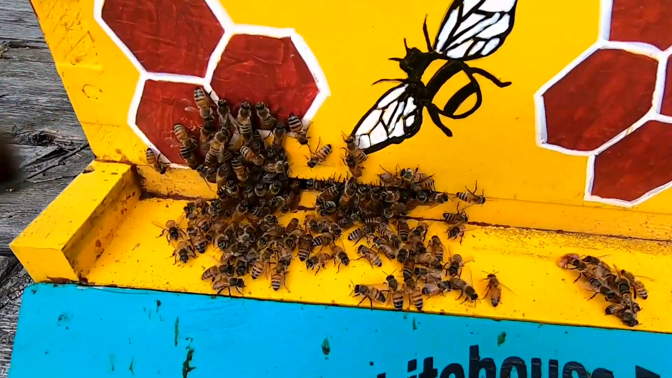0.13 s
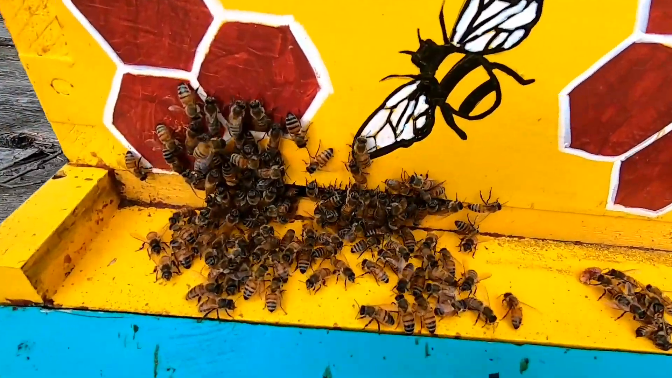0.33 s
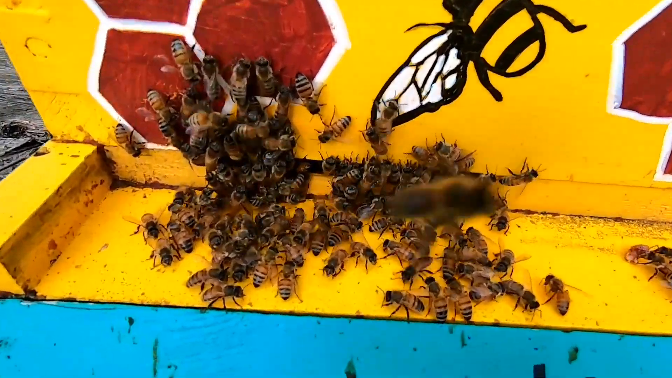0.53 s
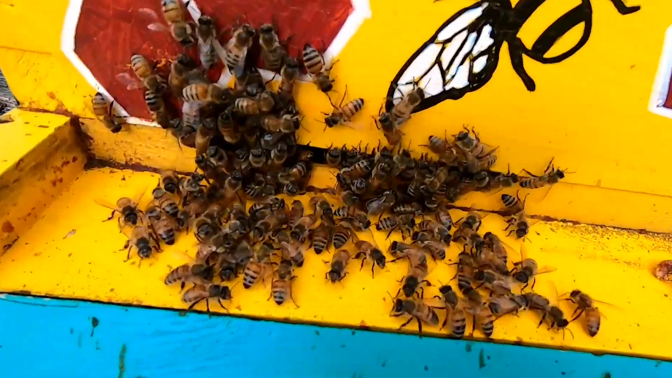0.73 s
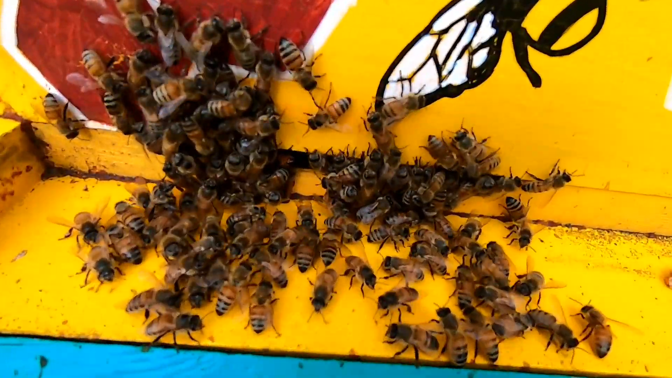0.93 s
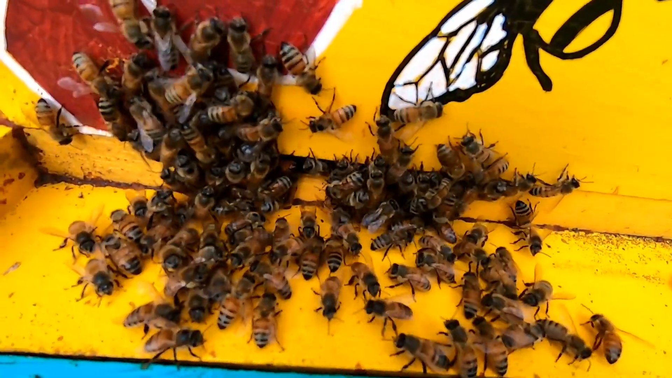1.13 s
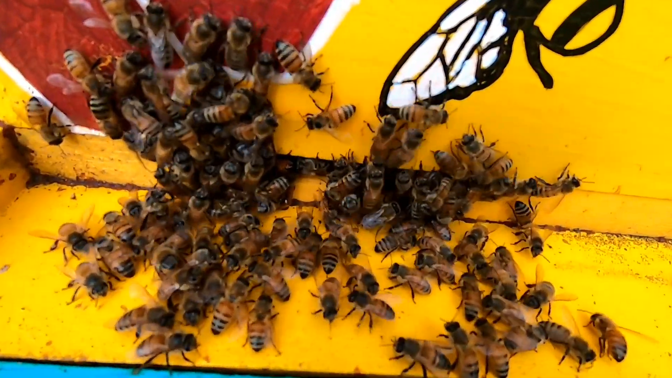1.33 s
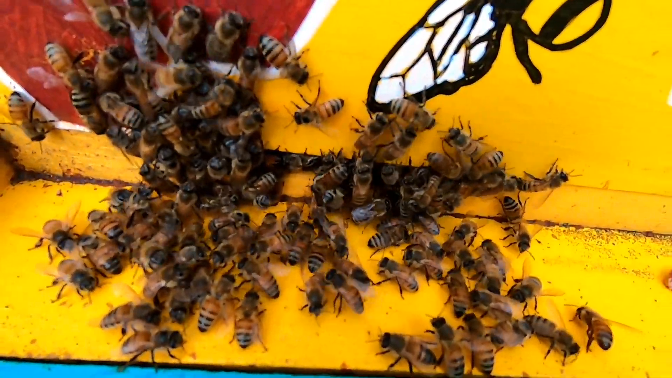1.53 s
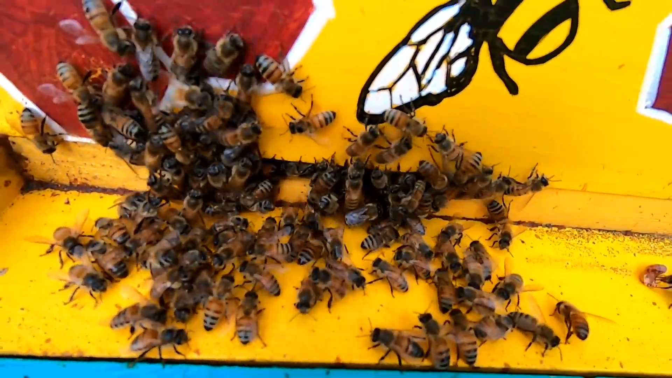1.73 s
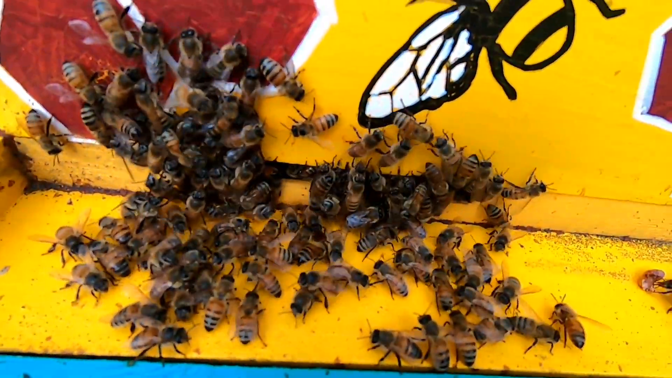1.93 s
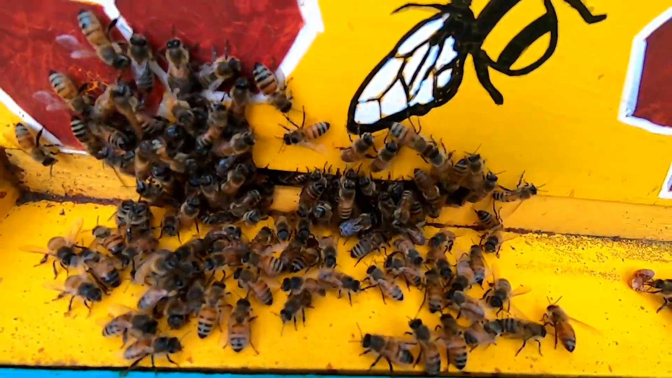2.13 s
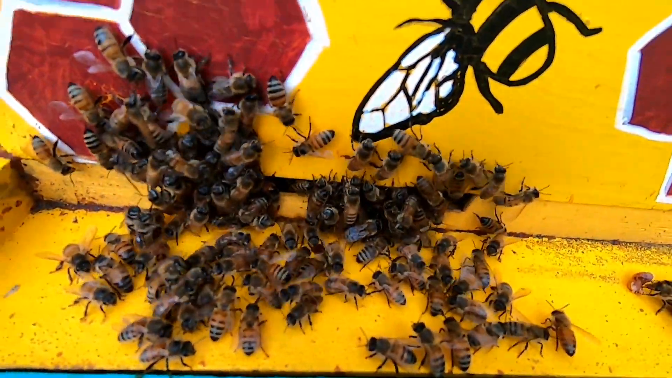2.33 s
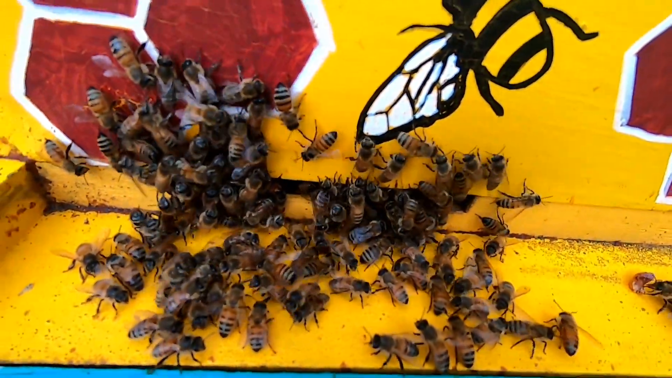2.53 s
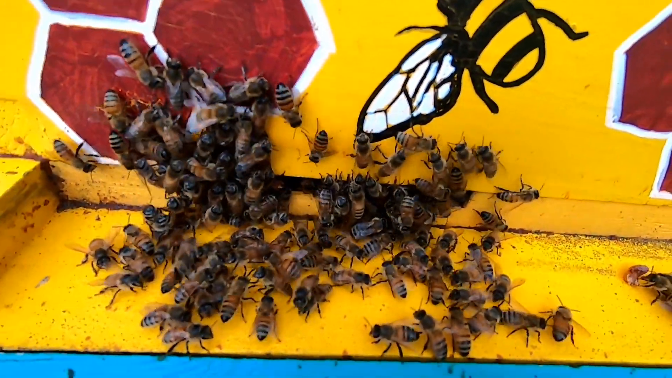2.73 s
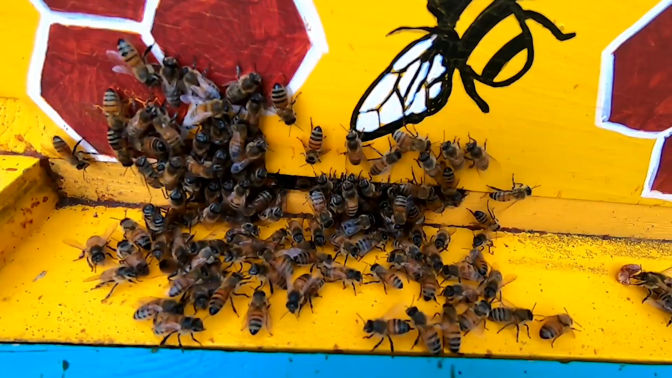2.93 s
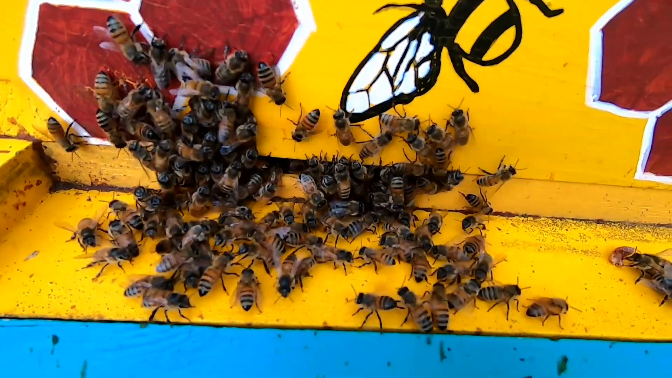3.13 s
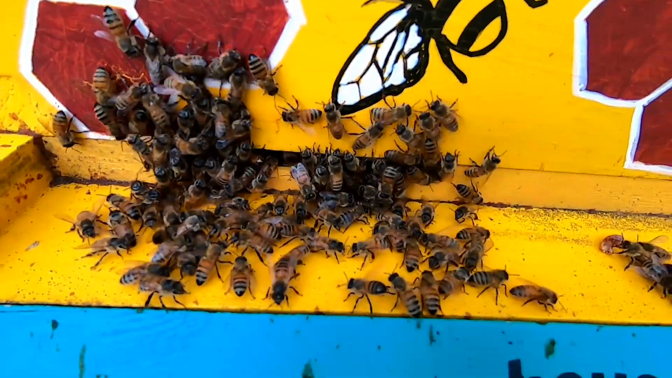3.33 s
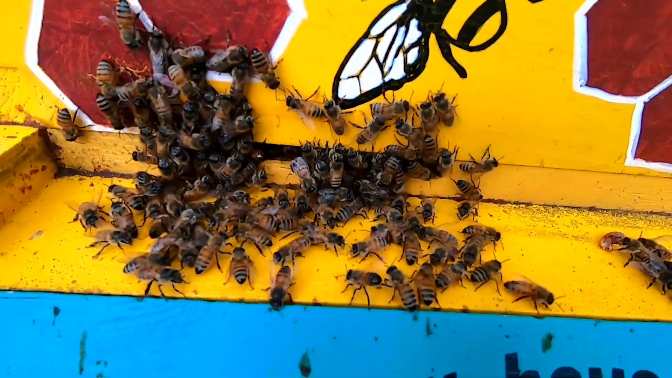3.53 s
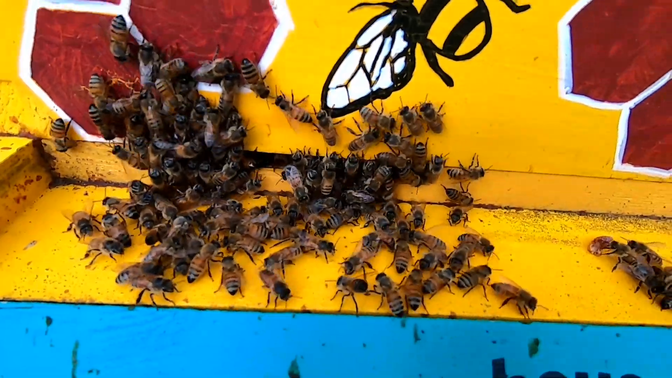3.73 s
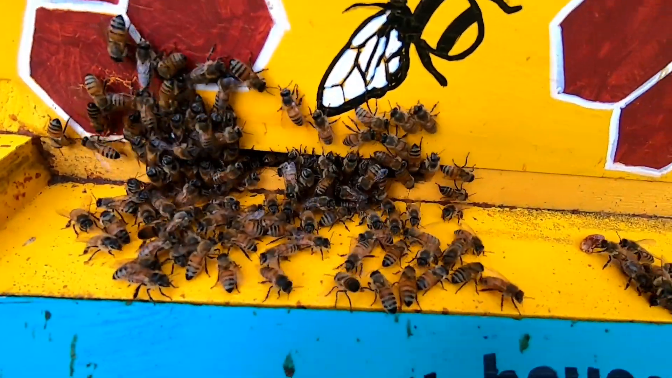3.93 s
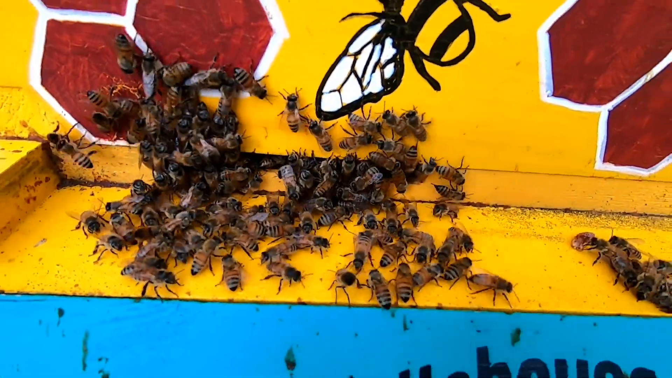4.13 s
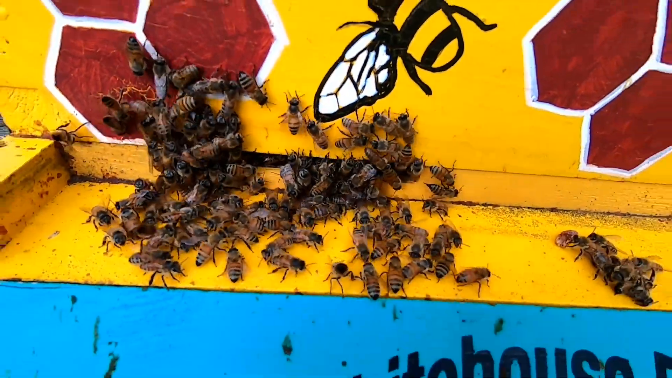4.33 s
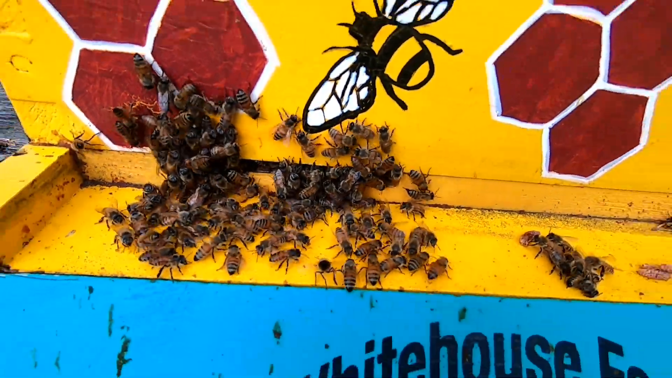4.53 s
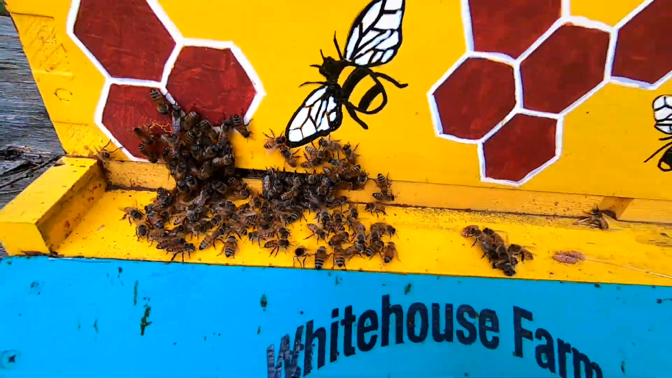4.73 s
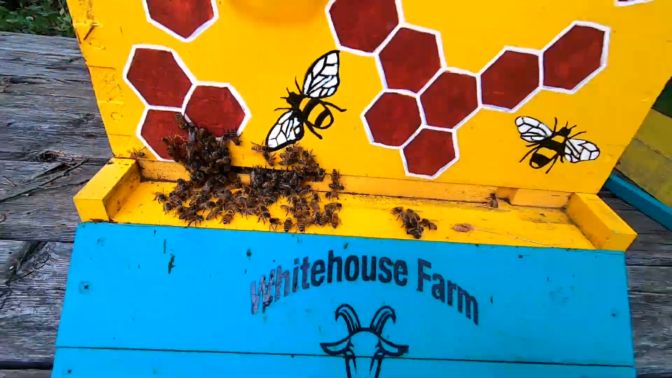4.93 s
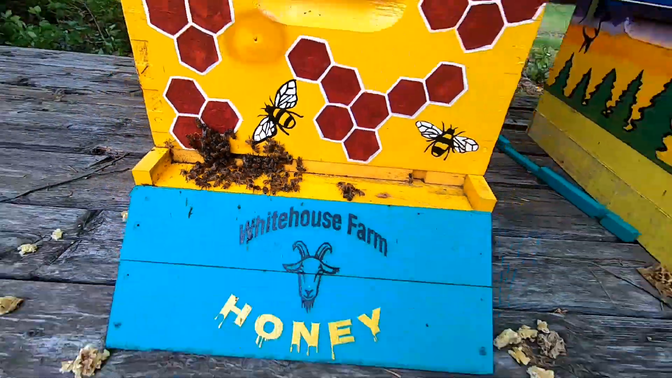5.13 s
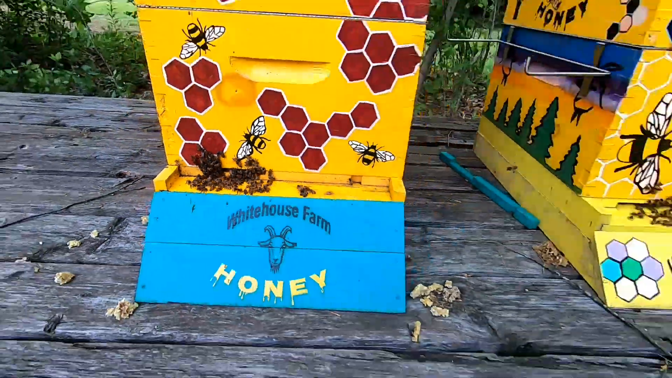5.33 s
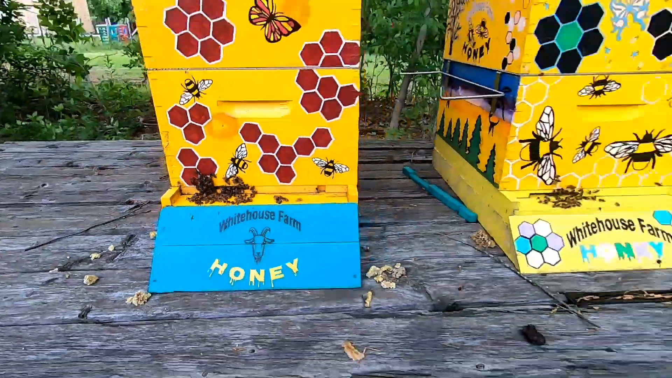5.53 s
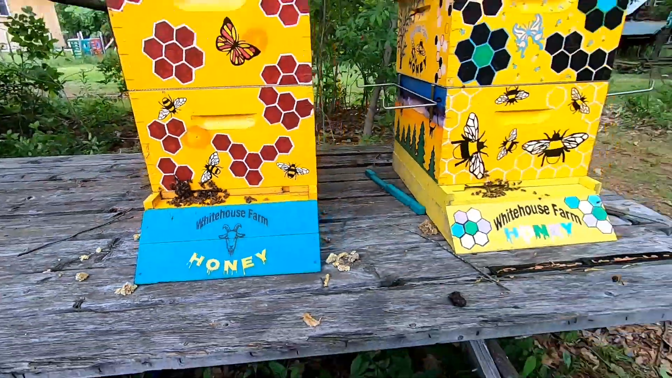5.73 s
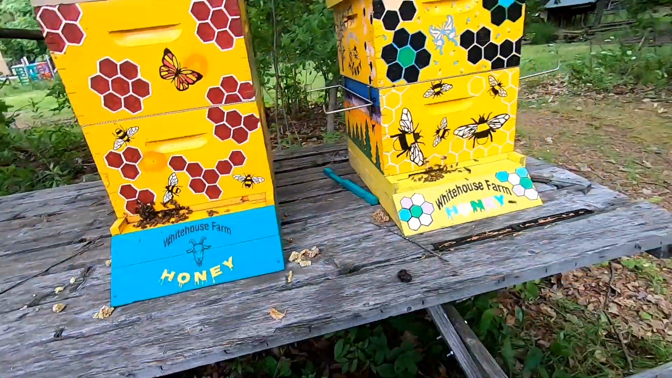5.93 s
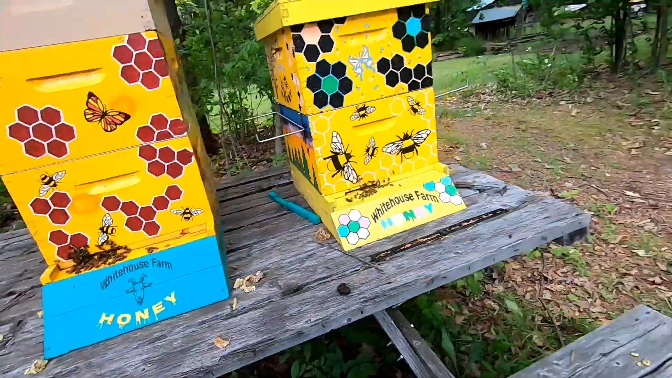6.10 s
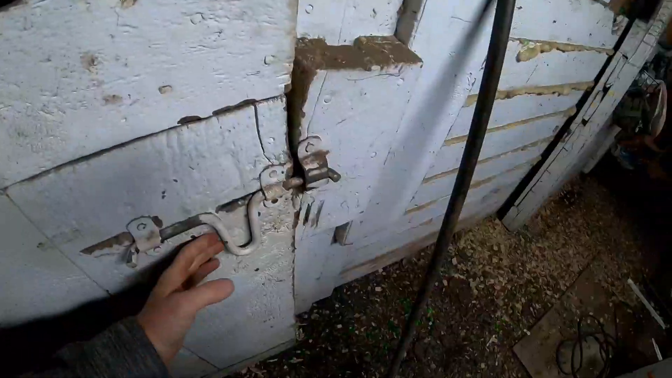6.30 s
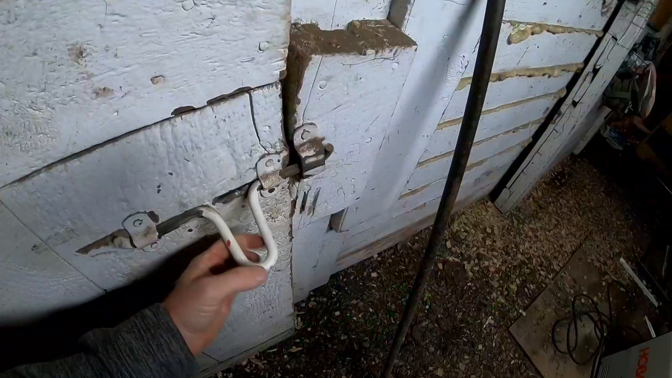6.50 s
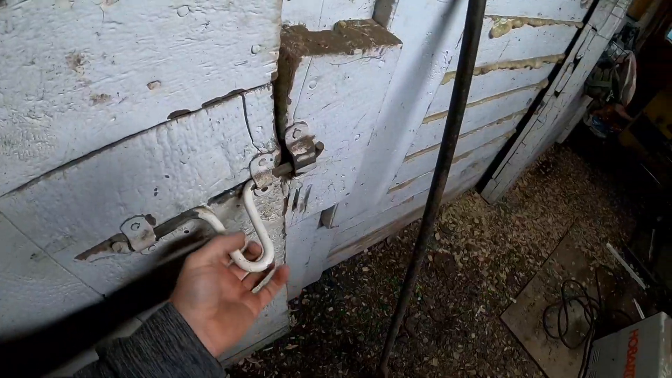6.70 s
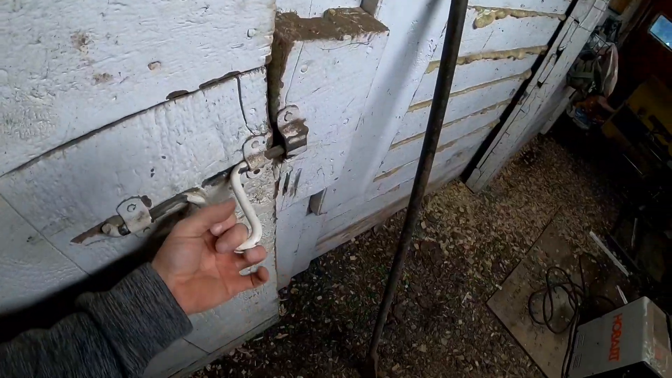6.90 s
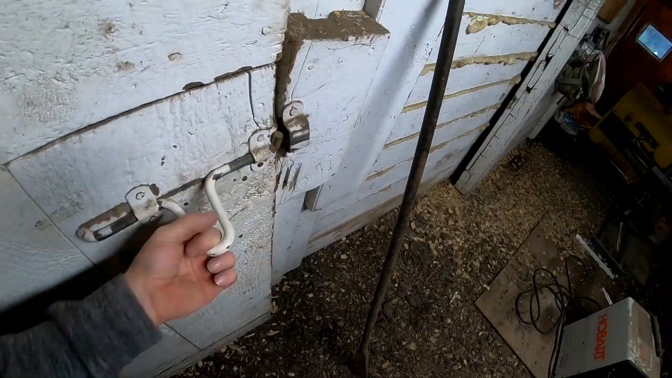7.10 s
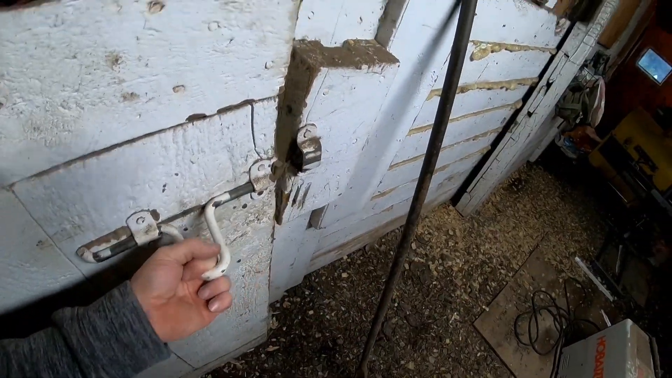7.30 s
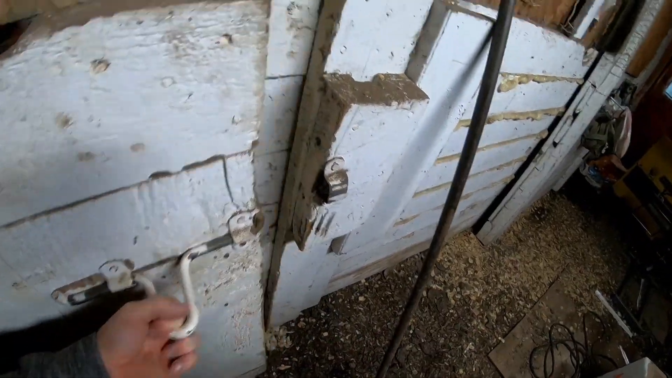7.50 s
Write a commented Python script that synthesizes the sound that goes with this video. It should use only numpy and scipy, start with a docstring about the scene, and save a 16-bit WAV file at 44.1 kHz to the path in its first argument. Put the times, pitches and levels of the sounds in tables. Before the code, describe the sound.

Outdoors at a hive, a faint wandering hum of bees sits under soft air and fluttering wind buffets. A bee zips past early on, then a louder, longer one amid rumbling gusts, while hiss swells on the left. Sound stops briefly. In a quiet shed, a steel bolt rattles and clanks back in three throws, wood knocks and booms, and a door creaks and scrapes open.

```python
"""Honeybees hum at a hive entrance: wandering harmonic tones, with single bees flying close past the microphone.
A breeze, made of coloured noise, buffets it. For a while the sound widens and a hiss swells on the left.
After a short silence, in a shed, a steel slide bolt is worked back in three clanks of ringing modes,
and the wooden door starts to scrape open in noisy jolts, with a boom and a short harmonic creak."""
import sys
import numpy as np
from scipy import signal
from scipy.fft import rfft, irfft, next_fast_len
from scipy.io import wavfile
from scipy.ndimage import uniform_filter1d

SR = 44100
rng = np.random.default_rng(int(sys.argv[2]) if len(sys.argv) > 2 else 0)


def pcm_store(signal):
    """Save signal as 16-bit PCM."""
    levels = np.round(np.clip(np.atleast_2d(signal), -1, 1) * 32767)
    wavfile.write(sys.argv[1], SR, levels.astype(np.int16).T)


N = 337805
T = np.arange(N) / SR

# deep colour of the breeze, relative: [f/Hz, level/dB]
RUMBLING_BREEZE = [(15, -7), (40, 2.5), (100, -0.5), (170, -10), (260, -14.5), (400, -28), (800, -36.5),
                   (2000, -54.5)]
# modes of the wooden door panel, levels relative: [f/Hz, level/dB, t60/s]
DOOR_MODES = [(105.6, -1.5, 0.4), (150, 3, 0.13), (198.7, 7, 0.12), (267.6, 0, 0.2), (311.4, -1.5, 0.15),
              (388, -2.5, 0.21)]


def amp(db):
    """Decibels to gain."""
    return np.exp(np.asarray(db) * (np.log(10) / 20))


def unit(x):
    """Scale to rms 1."""
    return x / np.sqrt(np.mean(x ** 2) + 1e-20)


def since(s):
    """Seconds gone by since time s, zero before it."""
    return np.maximum(T - s, 0)


def curves(rows, t=T):
    """Each column of a table, joined by straight lines in time."""
    s, *columns = np.transpose(rows)
    return [np.interp(t, s, c) for c in columns]


def at_pitch(points, hz):
    """Read a spectrum on a log-frequency axis."""
    f, value = np.transpose(points)
    return np.interp(np.log(hz), np.log(f), value)


def colour(x, points):
    """Causal minimum-phase filter with the given spectrum, falling off beyond its ends; rms 1."""
    size = next_fast_len(len(x) + SR // 10)
    hz = np.maximum(np.abs(np.fft.fftfreq(size, 1 / SR))[:size // 2 + 1], 1)
    ends = np.minimum(hz / points[0][0], 1) ** 2 * np.minimum(points[-1][0] / hz, 1) ** 2
    cepstrum = irfft(np.log(amp(at_pitch(points, hz)) * ends), size)
    # folding the cepstrum forward makes the filter causal
    response = np.exp(rfft(2 * cepstrum[:size // 2], size) - cepstrum[0])
    return unit(irfft(rfft(x, size) * response, size)[:len(x)])


def noise(points, size=N):
    """Coloured noise, rms 1."""
    return colour(rng.standard_normal(size), points)


def walk(rate, size=N):
    """Smooth random wander with rms 1, from `rate` random steps a second."""
    k = max(int(SR / rate), 2)
    steps = np.repeat(rng.standard_normal(size // k + 1), k)[:size]
    return unit(uniform_filter1d(uniform_filter1d(steps, k), k))


def add(out, s, x):
    """Mix x in from time s."""
    i = max(int(s * SR), 0)
    out[i:i + len(x)] += x[:max(N - i, 0)]


def ringing(modes, t):
    """Damped modes that build up over a cycle or two, never quite at the same pitch twice."""
    scatter_db = 3  # each blow lands on a different spot and favours other modes
    out = 0
    for hz, db, t60 in modes:
        phase = 2 * np.pi * (hz * (1 + 0.0061 * rng.standard_normal()) * t + rng.random())
        decay = amp(db + scatter_db * rng.standard_normal() - 60 * t / t60)
        build_up = (1 - np.exp(-2 * hz * t)) ** 2
        out = out + decay * np.sin(phase) * build_up
    return out


def stereo_width():
    """Share by which the image is open, 0-1."""
    # opening and closing of the image: [t/s, share 0-1]
    openness = [(2.78, 0.12), (3.05, 0.7), (3.4, 0.85), (4.75, 1), (5.15, 0.53), (5.5, 0.076)]
    return np.clip(np.interp(T, *np.transpose(openness), left=0, right=0), 0, 1)


def colony(count=3):
    """More bees hover round the hive, each a harmonic tone drifting in pitch and distance."""
    out = 0
    for _ in range(count):
        hz = 238 * (1 + 0.055 * walk(3) + 0.00985 * walk(60))
        phase = 2 * np.pi * np.cumsum(hz) / SR
        tone = sum(np.sin(k * phase) / k ** 0.94 for k in range(1, 8))
        out = out + amp(7.9 * walk(2.69)) * tone
    fade_db = np.interp(T, [4.7, 5.3], [0, -6.5])  # the hum drops to a lower level near the end
    return amp(-61.5 + fade_db) * unit(out)


def wings(hz, bright_db, count=24):
    """Fundamental, overtones with a small rush of air, and the sharp slap of each wing stroke."""
    # overtones of a wingbeat, relative: [f/Hz, level/dB]
    buzz = [(450, 9), (700, -1.5), (920, -7), (1170, 0), (1450, -14.5), (1720, -10), (2500, -20),
            (4000, -45), (8000, -56)]
    # one slap, relative: [f/Hz, level/dB]
    slap = [(300, -10.5), (650, 3.5), (1200, -10), (2000, -20), (3500, -28), (8000, -40), (15000, -47)]
    size = len(hz)
    phase = 2 * np.pi * np.cumsum(hz * (1 + 0.0245 * walk(130.2, size))) / SR
    turning = walk(26, size)  # the bee turns, so its buzz brightens and dulls
    overtones = 0
    for k in range(2, count):
        tilt_db = (bright_db + 0.54 * turning) * np.log(k / 2)
        db = at_pitch(buzz, k * hz) + tilt_db + 2.7 * walk(70, size)
        overtones = overtones + amp(db) * np.sin(k * phase + .5 * rng.standard_normal())
    rush = noise(buzz, size) * (1 + np.cos(phase))
    strokes = 1 + 0.13 * walk(237.4, size)  # wing strokes differ in strength
    beats = np.diff(phase // (2 * np.pi), prepend=0)  # one click a wingbeat
    slaps = colour(beats * amp(3.9 * rng.standard_normal(size)), slap)
    return unit(np.sin(phase)), unit(strokes * (unit(overtones) + amp(-9.5) * rush)), slaps


def far_bees():
    """Bees further off swell and fade, gliding a little in pitch."""
    # passes at some distance:
    # [start t/s, length/s, first wingbeat f/Hz, last wingbeat f/Hz, fundamental peak level/dB,
    #  overtones re fundamental level/dB]
    flights = [(0, 0.29, 275.6, 247.6, -58.5, 0.5), (0.551, 0.2, 236.8, 226, -56.5, 2),
               (0.737, 0.094, 248.2, 224, -60.5, 4.5), (1.121, 0.29, 246.2, 262.6, -53, -3.5),
               (1.241, 0.086, 262, 253, -42, -10), (1.681, 0.22, 255.6, 224.6, -56, -4.5),
               (3.144, 0.087, 221.6, 217, -42.5, -5), (3.187, 0.17, 233.2, 218.5, -50, -5),
               (3.965, 0.19, 233.3, 245.5, -51.5, -1.5)]
    out = np.zeros(N)
    for s, length, first_hz, last_hz, db, buzz_db in flights:
        size = int(length * SR)
        low, high, _ = wings(np.linspace(first_hz, last_hz, size), buzz_db, count=12)
        swell = np.sin(np.linspace(0, np.pi, size))
        add(out, s, amp(db) * swell * (low + amp(buzz_db) * high))
    return out


def breeze():
    """Eddies flutter and rumble on the microphone, harder in each gust; wing wash and bumps give damped swings."""
    # the breeze between gusts, before trims: [t/s, level/dB]
    lull = [(0, -44.5), (.55, -51.5), (1.0, -51), (1.7, -55.5), (2.1, -52.5), (2.95, -52.5), (3.3, -52.5),
            (3.9, -50.5), (4.5, -41), (5.0, -50.5), (5.5, -55), (5.9, -55), (6.05, -58)]
    # light flutter, which gives way to the deeper rumble as the image widens, relative: [f/Hz, level/dB]
    flutter = [(22, -13), (48, 8), (90, -0.5), (180, 1.5), (280, -8), (400, -20), (800, -42.5), (2000, -68)]
    # gusts that buffet the microphone, before trims: [t/s, length/s, peak level/dB]
    gusts = [(.09, 0.12, -47), (0.255, 0.073, -41), (0.72, 0.037, -40), (0.79, 0.095, -41.5),
             (0.914, 0.1, -46.5), (1.967, 0.19, -44.5), (2.17, 0.069, -45), (2.256, 0.074, -50),
             (2.42, 0.038, -44.5), (2.557, 0.054, -42.5), (3.196, 0.08, -43.5), (3.551, 0.049, -34.5),
             (3.739, 0.077, -39), (3.908, 0.02, -39), (4.154, 0.038, -34.5), (4.303, 0.057, -34.5),
             (4.39, 0.062, -32), (4.608, 0.049, -29.5), (4.82, 0.13, -40.5), (5.037, 0.11, -45),
             (5.35, 0.043, -47), (5.723, 0.12, -51), (5.826, 0.04, -43.5), (5.919, 0.05, -38)]
    # wing wash and light bumps on the microphone:
    # [t/s, swing peak level/dB, ring f/Hz, length/s, crack re ring level/dB]
    puffs = [(1.4599, -23.5, 474, 0.0031, -9), (1.461, -20.5, 75.4, 0.0069, -18),
             (1.4683, -22.5, 150, 0.0056, -12), (2.003, -36, 110, 0.0063, -13),
             (2.14, -40.5, 140, .004, -16), (2.175, -40, 196, 0.016, -14), (2.276, -38, 100, 0.0043, -13),
             (2.41, -36.5, 95, .005, -22), (2.54, -35, 172, .009, -20), (2.566, -40, 190, 0.01, -12),
             (4.138, -25, 530, 0.003, -3), (4.142, -25.5, 149, 0.0043, -31), (4.288, -39, 3450, 0.0032, 0),
             (4.392, -26, 133, 0.026, -36), (4.617, -20.5, 109, 0.0038, -25),
             (4.817, -26, 109, 0.0052, -36), (5.619, -45, 300, 0.0022, -2), (5.625, -38.5, 54.4, .016, -36),
             (5.697, -36.5, 150, 0.007, -22), (5.974, -35, 172, 0.0055, -25)]
    # the crack of a bump, relative: [f/Hz, level/dB]
    crack = [(150, -16.5), (350, 10), (800, -4.5), (1300, -21.5), (2500, -27), (6000, -37), (15000, -57)]
    deep = stereo_width()
    eddies = np.sqrt(1 - deep) * noise(flutter) + np.sqrt(deep) * amp(2.5) * noise(RUMBLING_BREEZE)
    power = amp(curves(lull)[0] + 1.0 + 1.5 * walk(13)) ** 2
    for s, length, db in gusts:
        near = np.abs(T - s) < 2 * length
        power[near] += (amp(db) * np.exp(-2 * ((T[near] - s) / length) ** 2)) ** 2
    out = eddies * np.sqrt(power) * amp(-.5 + 2.0 * walk(30))
    t = T[:SR // 5]
    for s, db, hz, length, crack_db in puffs:
        swing = np.sin(2 * np.pi * hz * t) + amp(crack_db) * noise(crack, len(t))
        envelope = (2 * t / length) * np.exp(1 - 2 * t / length)  # peaks at half the length
        add(out, s, amp(db) * swing * envelope)
    return out


def outdoor_air():
    """Steady air around the hive: coloured noise with a slight drift in level."""
    # relative: [f/Hz, level/dB]
    air_colour = [(210, -4.5), (350, -3), (510, -4.5), (677, -8.5), (744, -10), (928, -13.5), (3160, -12.5),
                  (4760, -18), (7160, -21), (9660, -26.5), (11100, -34), (12400, -36), (15000, -50)]
    return amp(-57 + 0.23 * walk(2.8)) * noise(air_colour)


def sizzle():
    """A thin, steady band of high noise."""
    return amp(-74) * noise([(11300, -19.0), (12200, -5.5), (15500, -22.5)])


def near_bees():
    """Bees fly right past the microphone: the fundamental swells; at the closest the single wing strokes slap."""
    # close passes, one curve each: [t/s, wingbeat f/Hz, fundamental level/dB, overtones level/dB]
    flights = [
        [(1.365, 261, -62, -60), (1.404, 234.4, -40.5, -46), (1.438, 213.6, -30.5, -43.5),
         (1.454, 228, -42.5, -46), (1.467, 240, -31.5, -39), (1.48, 247.4, -47, -37), (1.497, 242, -45, -46.5),
         (1.52, 240, -61, -58)],
        [(4.5, 233.2, -59.5, -55.5), (4.55, 233.1, -46.5, -45), (4.598, 226.6, -41, -43.5),
         (4.62, 219.3, -34.5, -33.5), (4.656, 216.7, -27.5, -35), (4.684, 223.6, -22.5, -31.5),
         (4.702, 214, -30.5, -32.5), (4.72, 231.6, -23, -30.5), (4.74, 229.2, -41, -36),
         (4.756, 230.5, -38, -32), (4.775, 241.2, -43, -33), (4.8, 240.4, -41, -35.5),
         (4.826, 230.6, -34, -40.5), (4.854, 227.3, -38.5, -46), (4.892, 237.2, -45, -49),
         (4.93, 237.6, -58, -58)],
    ]
    # closest approaches, where each wing stroke slaps: [t/s, length/s, level/dB]
    closest = [(1.464, 0.009, -42.5), (4.715, 0.0088, -30), (4.75, .008, -43)]
    full_buzz_db, dulling = -31, .2  # the buzz is neutral at this level and dulls as it fades
    out = np.zeros(N)
    for flight in flights:
        t = T[(T >= flight[0][0]) & (T < flight[-1][0])]
        hz, body_db, buzz_db = curves(flight, t)
        low, high, slaps = wings(hz, dulling * (buzz_db - full_buzz_db))
        close = sum(amp(db) * np.exp(-((t - s) / length) ** 2) for s, length, db in closest)
        bee = amp(body_db) * low + amp(buzz_db) * high + close * slaps
        add(out, t[0], signal.windows.tukey(len(t), .1) * bee)
    return out


def hiss():
    """A smooth hiss of coloured noise that swells, holds and fades again."""
    # relative: [f/Hz, level/dB]
    hiss_colour = [(180, -15.5), (300, -0.5), (490, -2), (637, -5), (714, -7.5), (1080, -8.5), (3220, -4.5),
                   (3980, -9), (4690, -7.5), (5350, -10.5), (7850, -5), (8600, -10.5), (10100, -23.5),
                   (12700, -29), (14000, -38.5), (15000, -47)]
    swell = 1 - np.exp(-since(2.69) / 0.7)
    fade = np.exp(-since(4.69) / 0.22)
    return amp(-43.5) * noise(hiss_colour) * swell * fade


def widen(mid):
    """The image opens: the left grows louder and leads; the right keeps a faint rumble and hiss of its own."""
    # left over right when fully open: [f/Hz, level/dB]
    balance = [(100, 25), (220, 19), (330, 12), (700, 4.5), (1100, 1), (3000, 1), (3900, 3.5), (4500, 15.5),
               (6000, 26.5)]
    # phase by which the left leads when fully open: [f/Hz, phase/radians]
    lead = [(50, .5), (130, 1.4), (340, 3.9), (700, 3.56), (1500, 4.07), (3000, 4.92), (6000, 8.9)]
    width = stereo_width()
    size = next_fast_len(N)
    hz = np.maximum(np.fft.rfftfreq(size, 1 / SR), 1)
    ratio = amp(at_pitch(balance, hz)) * np.exp(1j * at_pitch(lead, hz))
    side = irfft(rfft(mid, size) * (ratio - 1) / (ratio + 1), size)[:N] * width
    rumble = amp(-52.0 + 4.1 * walk(7.0)) * noise(RUMBLING_BREEZE)
    faint_hiss = amp(-59.0) * noise([(500, -16.0), (3000, -5.5), (5200, -9.5), (9000, -15), (14000, -38.5)])
    return np.array([mid + side, mid - side + width * (rumble + faint_hiss)])


def shed_air():
    """The still shed: steady coloured noise."""
    # relative: [f/Hz, level/dB]
    shed_colour = [(15, -18), (25, -6), (52, -3), (112, -24), (161, -7), (262, -19.5), (340, -24),
                   (737, -25.5), (1440, -34.5), (2020, -28.5), (4380, -29.5), (12000, -61.5), (15600, -101),
                   (22000, -120)]
    return amp(-52) * noise(shed_colour)


def strike(modes, dull, length, dull_t60, ring_db, room_db, room_t60):
    """One blow on a body: first contact and uneven rebounds, its modes, a dense short ring and the shed's echo."""
    rebounds_per_s, touch_s = 420, 0.00093  # small rebounds within a blow, and how long each touches
    t = T[:SR // 2]
    rebounds = (rng.random(len(t)) < rebounds_per_s / SR) * amp(2.1 * rng.standard_normal(len(t)))
    touch = signal.lfilter([1], [1, -np.exp(-1 / (SR * touch_s))], rebounds + 1.05 * (t == 0))
    contact = rng.standard_normal(len(t)) * (0.78 + 2.47 * touch) * np.exp(-t / length)
    ring = ringing(modes, t) * (1 - np.exp(-3 * t / length)) ** 2
    tail = rng.standard_normal(len(t)) * (amp(-60 * t / dull_t60) + amp(room_db - 60 * t / room_t60))
    dense = colour(contact + 0.44 * tail * amp(2.2 * walk(260, len(t))), dull)
    # balance the parts over 20 ms, then level the blow over its first 10 ms
    blow = dense / np.std(dense[:SR // 50]) + amp(ring_db) * ring / np.std(ring[:SR // 50])
    return blow / np.std(blow[:SR // 100])


def latch():
    """The bolt rubs and clacks in its keepers; the planks knock with it and the heavy door answers a little later."""
    # blows of bolt and door:
    # [t/s, door thud level/dB, plank knock level/dB, steel clack level/dB, rattle length/s,
    #  steel ring re clack level/dB]
    clanks = [(6.429, -49.5, -58.5, -56.5, 0.0013, -16), (6.582, -46, -47, -53, 0.0092, -12),
              (6.642, -22, -26, -19.5, 0.0021, -0.5), (6.741, -45, -32.5, -49, 0.0017, -3),
              (6.777, -39, -34.5, -62, 0.0013, -12), (6.787, -42, -40, -64, .002, -12),
              (6.803, -38, -48, -42.5, 0.0032, 0), (6.877, -41, -42.5, -59, 0.0098, -7),
              (6.9358, -30, -28.5, -30.5, 0.0033, -8), (6.9402, -29.5, -24.5, -35.5, 0.0048, -10),
              (6.991, -40, -50, -46.5, 0.0038, -9), (7.052, -51, -58, -57, .002, -6),
              (7.072, -54, -49, -49, 0.0055, -10), (7.139, -28.5, -26.5, -23, 0.0048, -10),
              (7.149, -27.5, -24, -31, 0.012, -10), (7.160, -31, -25.5, -27.5, 0.0056, -11),
              (7.1645, -24.5, -26, -24, 0.0041, -11.5), (7.169, -23, -23.5, -36, 0.0029, -4),
              (7.186, -25, -35.5, -43, 0.0032, -7), (7.203, -31.5, -40, -47.5, 0.0022, -12.5),
              (7.224, -38, -34, -41, 0.0038, -12), (7.241, -36, -32.5, -43.5, 0.0031, -12.5),
              (7.2955, -34, -31, -37, 0.0085, -10), (7.349, -43, -37.5, -55, 0.0068, -11),
              (7.407, -28, -47, -54.5, 0.0049, -10), (7.441, -35, -56.5, -51.5, 0.006, -4),
              (7.598, -23.5, -49, -61, 0.0046, -14), (7.624, -23.5, -46, -59, 0.0045, -14)]
    # throws of the bolt, rubbing harder up to the stop and rattling on after it:
    # [stop t/s, rub level/dB, run-up/s, settling/s]
    throws = [(6.641, -29, 0.013, 0.037), (6.938, -36, 0.0024, 0.025), (7.14, -27.5, 0.019, 0.047)]
    # thin, narrow ringing that swells just before the blow: [t/s, length/s, level/dB]
    thin_rings = [(6.512, 0.12, -62.5), (6.619, 0.042, -34)]
    # modes of planks and bolt, relative: [f/Hz, level/dB, t60/s]
    plank_modes = [(473, -18, .1), (613, 1.5, 0.15), (768, -2.5, 0.13), (862, -0.5, 0.17),
                   (950, -8.5, 0.11), (1040, 4, 0.085), (1240, -8.5, 0.13), (1460, -6, 0.15),
                   (1756, 3, 0.052), (2160, -11, 0.056), (2780, -9.5, 0.087)]
    bolt_modes = [(3200, -22, 0.12), (3790, -6, 0.048), (4300, -20, .16), (4850, -13, 0.11),
                  (5170, 1, 0.073), (5400, 7.5, 0.044), (5960, -7.5, 0.11), (6310, -11, 0.15),
                  (6540, -12, .1), (7620, -18, 0.1)]
    # dense, quickly dying part of door, planks and bolt, relative: [f/Hz, level/dB]
    door_dull = [(30, -19), (70, -19), (150, 4.5), (300, -5), (500, -29), (1200, -40)]
    plank_dull = [(200, -12), (450, 2), (1000, -1), (1900, -8), (2800, -12.5), (5000, -40)]
    bolt_dull = [(1200, -1.5), (2500, -7), (4000, 1), (5300, 3.5), (6400, -9), (7200, -18.5), (8500, -22),
                 (10000, -44), (15000, -64)]
    catches = rng.standard_normal(N) * (rng.random(N) < 2500 / SR)  # small random catches, 2500 a second
    steel = unit(signal.fftconvolve(catches, ringing(bolt_modes, T[:SR // 5]))[:N])
    rub = 0
    for s, db, run_up, settling in throws:
        fall = np.maximum(s - T, 0) / run_up + since(s) / settling
        rub = rub + amp(db) * np.exp(-np.minimum(fall, 20))
    bolt_rasp = amp(5.0) * colour(catches, bolt_dull)
    plank_rasp = amp(10.5) * colour(catches, plank_dull)
    out = rub * amp(1.8 * walk(300)) * unit(steel + bolt_rasp + plank_rasp)
    for s, length, db in thin_rings:
        size = int(length * SR)
        add(out, s, amp(db) * unit(np.hanning(size) * steel[int(s * SR):][:size]))
    for s, thud_db, knock_db, clack_db, length, steel_db in clanks:
        thud = strike(DOOR_MODES, door_dull, length, dull_t60=0.029, ring_db=-2.0, room_db=-10.0, room_t60=0.98)
        knock = strike(plank_modes, plank_dull, length, dull_t60=0.13, ring_db=-0.5, room_db=-4.0, room_t60=0.6)
        clack = strike(bolt_modes, bolt_dull, 1.1 * length, dull_t60=0.056, ring_db=steel_db,
                       room_db=-10.5, room_t60=0.41)
        add(out, s + 0.00318, amp(thud_db) * thud)
        add(out, s, amp(knock_db) * knock)
        add(out, s, amp(clack_db) * clack)
    return out


def door():
    """The door sticks and slips under each push: jolts shake its panel, grit scrapes, wood and metal squeak."""
    # pushes on the door: [start t/s, length/s, rumble level/dB, scrape level/dB, swell/(dB per s)]
    pushes = [(6.534, 0.22, -40.5, -42, 2), (6.837, 0.36, -46, -55, 18), (7.133, 0.064, -26.5, -39, 0),
              (7.306, 0.327, -35.5, -44, 36)]
    # the dragging door's rumble, then its scrape, relative: [f/Hz, level/dB]
    rumble_colour = [(25, -5), (55, -1.5), (105, -0.5), (200, 1), (320, -10), (500, -21), (1200, -47.5)]
    scrape_colour = [(180, -19.5), (300, -9.5), (384, -0.5), (455, -9), (669, -9), (757, -9.5), (1260, -13),
                     (2560, -33.5), (3770, -32.5), (6180, -37), (9820, -73.5), (12000, -70), (15600, -101),
                     (22000, -120)]
    # groans and squeaks of door and bolt: [t/s, length/s, f/Hz, level/dB, pitch scatter share]
    squeaks = [(6.56, 0.072, 200, -39, .1), (6.731, 0.021, 2047, -35.5, 0.13),
               (6.732, 0.034, 1560, -42, 0.13), (6.851, .065, 218.6, -40.5, .18),
               (7.551, 0.026, 3800, -44.5, 0.06)]
    attack_s, release_s = 0.089, 0.066
    shaking = scraping = 0
    for s, length, rumble_db, scrape_db, swell in pushes:
        force = np.minimum(since(s) / attack_s, 1) * np.exp(-since(s + length) / release_s)
        force = force * amp(swell * np.minimum(since(s), length))
        shaking = shaking + amp(rumble_db) * force
        scraping = scraping + amp(scrape_db) * force
    slips = rng.standard_normal(N) * (rng.random(N) < 450 / SR)  # uneven jolts, 450 a second
    panel = unit(signal.fftconvolve(slips, ringing(DOOR_MODES, T[:SR // 2]))[:N])
    rumble = unit(colour(slips, rumble_colour) + amp(-4.5) * panel)
    grit = unit(colour(slips, scrape_colour) + amp(8.0) * noise(scrape_colour))
    out = shaking * rumble + scraping * amp(2.0 * walk(45)) * grit
    for s, length, hz, db, scatter in squeaks:
        size = int(length * SR)
        phase = 2 * np.pi * np.cumsum(hz * (1 + scatter * walk(1500, size))) / SR
        add(out, s, amp(db) * unit(np.hanning(size) * np.sin(phase)))
    return out


def boom():
    """Let go by the bolt, the whole door panel swings at its lowest note."""
    start_s, hz, db, t60_s = 7.166, 106.6, -19, 0.48
    t = since(start_s)
    phase = 2 * np.pi * np.cumsum(hz * (1 + 0.0308 * walk(40))) / SR
    return amp(db - 60 * t / t60_s) * (1 - np.exp(-t * hz)) * np.sin(phase)


def creak():
    """The freed door sticks and slips: a short creak, pitched below and rasping above, that dies away in the shed."""
    # the rasp of each slip, relative: [f/Hz, level/dB]
    rasp_colour = [(400, 0), (900, 2.5), (2000, -6), (2600, -12), (3700, -13), (5000, -16), (9000, -35),
                   (15000, -72)]
    # harmonics of the slip rate from the first up, relative: [level/dB]
    partials_db = [-6.5, -1, -5.5, -19, -21, -29, -22.5, -23, -21]
    slip_hz, db, start_s, length_s = 417, -29.5, 7.296, .068
    blur = .035  # uneven slips smear the higher harmonics (radians per harmonic number squared)
    out, size, t = np.zeros(N), int(length_s * SR), T[:SR // 3]
    phase = 2 * np.pi * np.cumsum(slip_hz * (1 + 0.015 * walk(380, size))) / SR
    tone = 0
    for k, partial_db in enumerate(partials_db, 1):
        level = amp(partial_db + 2.9 * walk(150, size))
        tone = tone + level * np.sin(k * phase + blur * k ** 2 * walk(400, size))
    rasp = noise(rasp_colour, size) * (1 + np.cos(phase))
    rise_db = np.minimum(np.linspace(-7, 5, size), 0)
    force = signal.windows.tukey(size, .35) * amp(rise_db + 1.4 * walk(300, size))
    direct = amp(db) * unit(force * (unit(tone) + amp(-11.0) * unit(rasp)))
    echo = rng.standard_normal(len(t)) * amp(-60 * t / 0.24)
    add(out, start_s, direct)
    add(out, start_s, amp(-9.5) * signal.fftconvolve(direct, echo / np.linalg.norm(echo)))
    return out


def scene():
    """The hive, a moment of silence, then the shed."""
    bees = colony() + far_bees() + near_bees()
    outside = widen(bees + breeze() + hiss() + outdoor_air())
    outside[0] += sizzle()  # on the left only
    inside = latch() + door() + boom() + creak() + shed_air()
    hive_gate = np.clip((6.203 - T) / 0.014, 0, 1)
    shed_gate = np.clip(np.minimum((T - 6.285) / 0.064, (T[-1] - T) / 0.0035), 0, 1)
    return outside * hive_gate + inside * shed_gate


def record(dry):
    """A steep elliptic low-pass takes away the top above 15.2 kHz."""
    return signal.sosfilt(signal.ellip(8, .2, 70, 15200, fs=SR, output="sos"), dry)


dry = scene()
out = record(dry)
pcm_store(out)
```